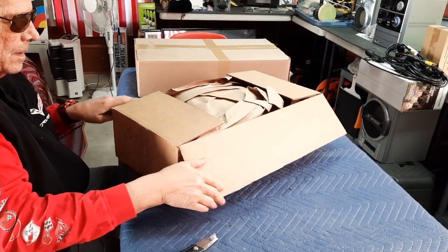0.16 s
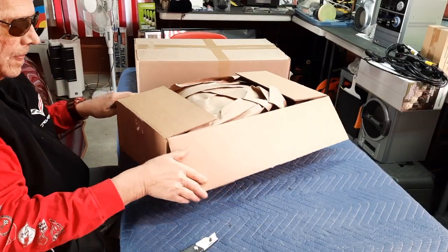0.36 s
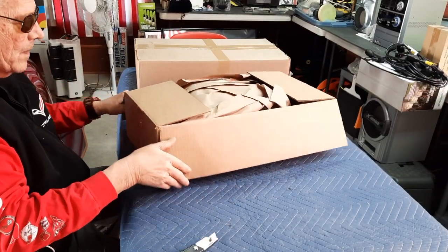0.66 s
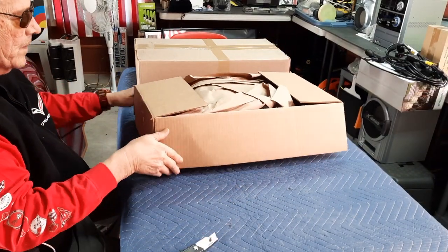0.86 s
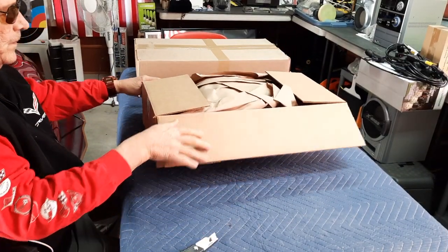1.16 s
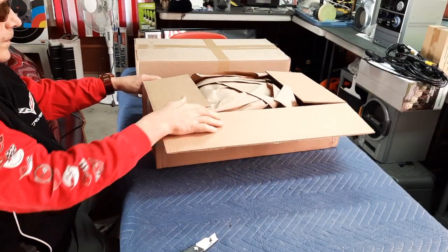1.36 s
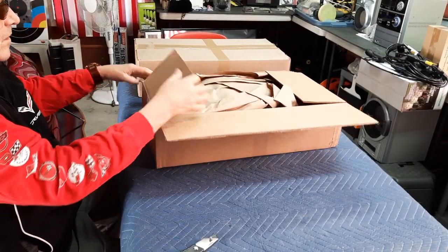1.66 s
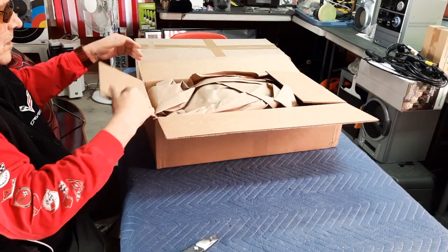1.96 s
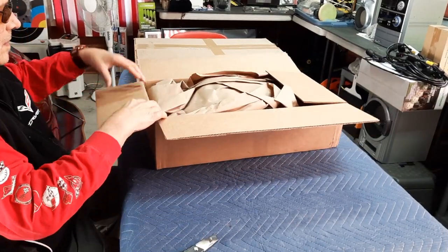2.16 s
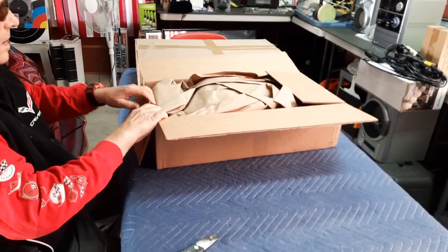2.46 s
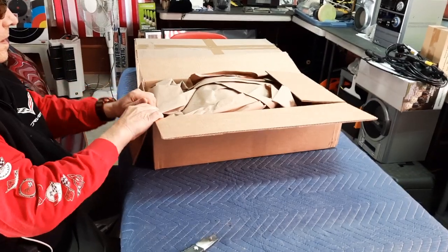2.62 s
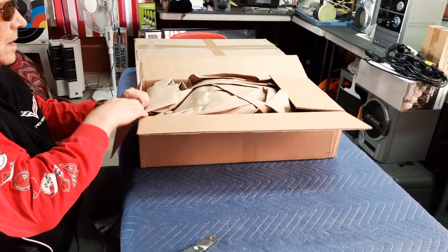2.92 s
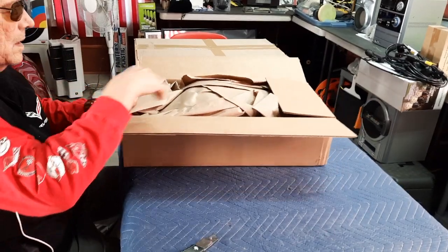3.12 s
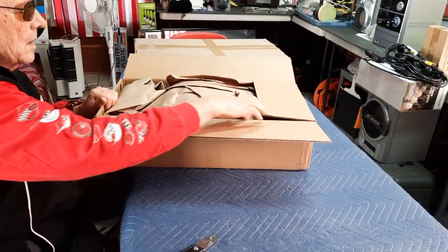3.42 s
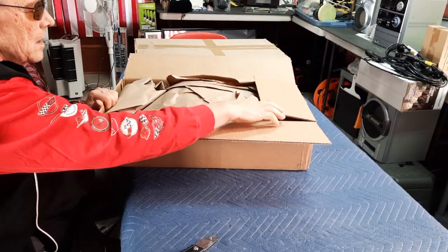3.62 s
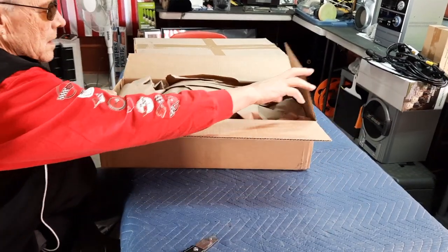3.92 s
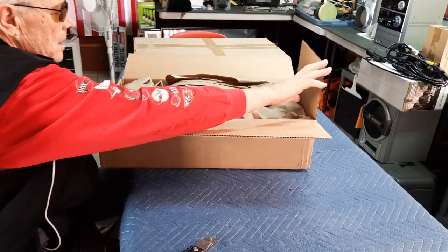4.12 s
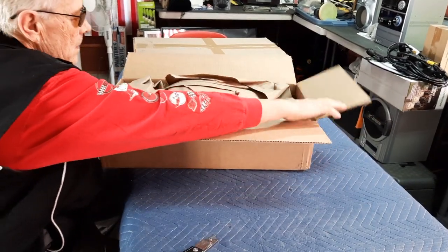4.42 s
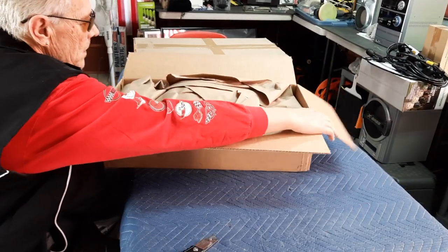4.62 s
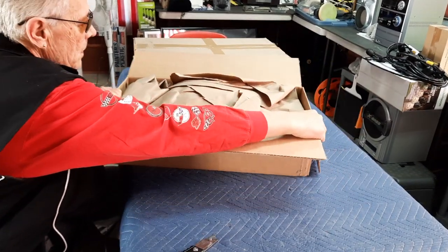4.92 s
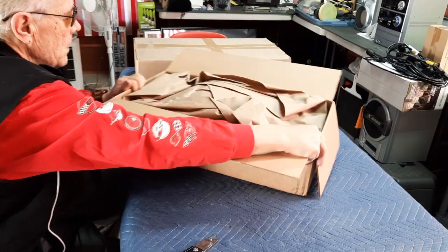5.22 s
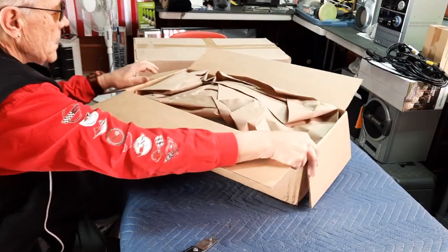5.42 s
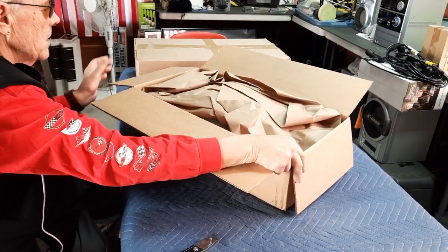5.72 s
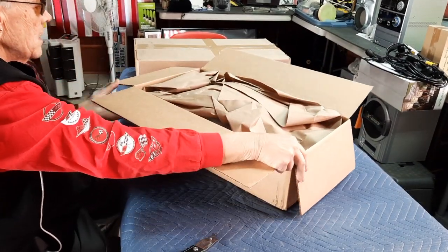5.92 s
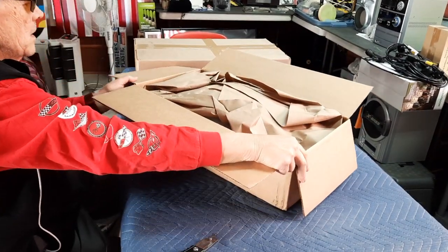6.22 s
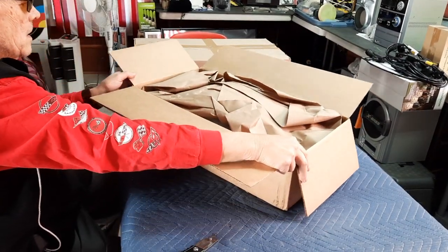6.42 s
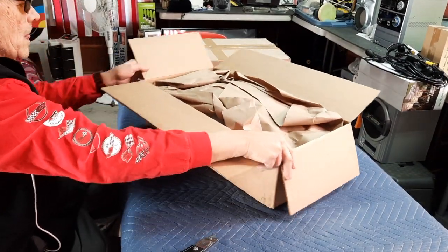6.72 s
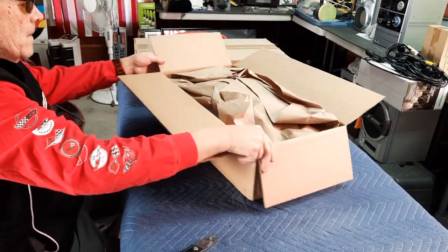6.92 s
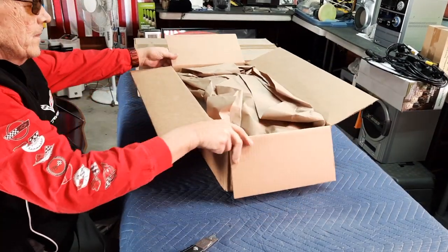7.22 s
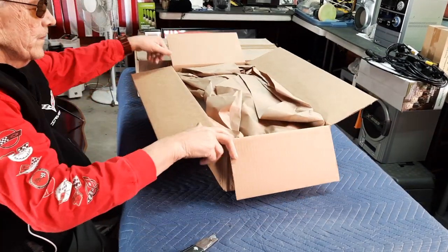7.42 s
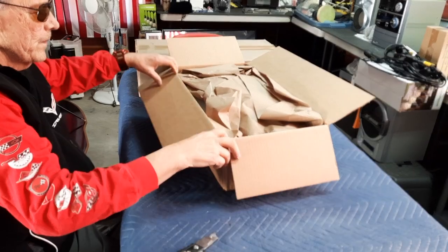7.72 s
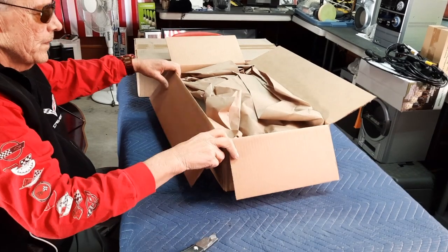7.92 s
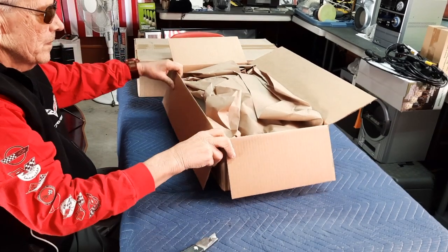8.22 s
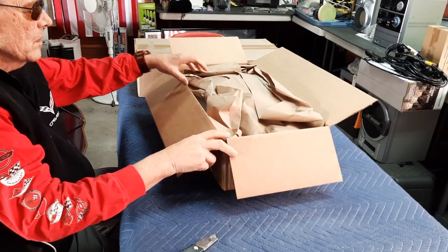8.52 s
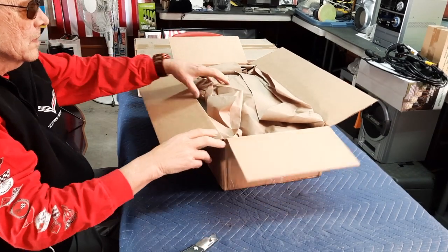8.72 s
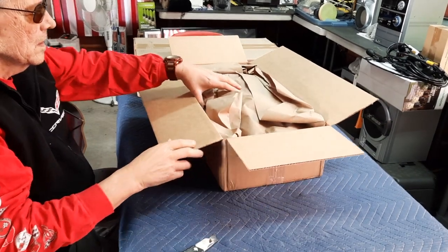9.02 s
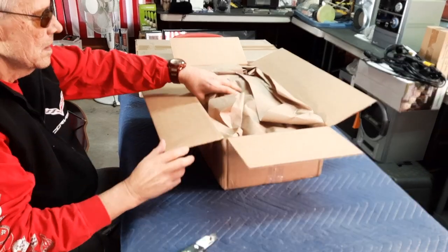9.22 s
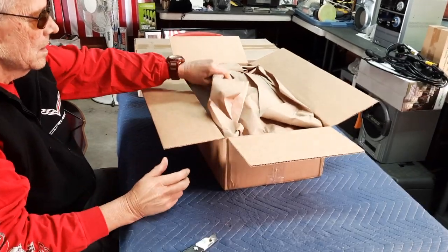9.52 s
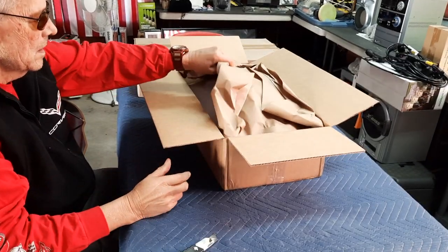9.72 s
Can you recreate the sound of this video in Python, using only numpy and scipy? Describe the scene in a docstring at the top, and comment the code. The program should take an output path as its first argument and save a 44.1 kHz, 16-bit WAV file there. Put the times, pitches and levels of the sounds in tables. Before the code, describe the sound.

Quiet, close cardboard handling in a workshop: sliding fingers and sleeves hiss over board, flaps bend with low hollow scrapes and small muffled thuds. Occasional dry paper creases pop around the middle. A brief judder ends in a single hard, woody knock, followed by more gentle rubbing and a soft thump. In the last second or so, thick packing paper is pulled and crinkles brightly. Stereo leans a little left, with short diffuse echoes.

```python
"""Handling a cardboard box of packing paper

Hands turn and open a cardboard box full of crumpled packing paper on a padded table in a workshop.
Skin and sleeves rub the board: shaped noise that swells with each slide and drag.
Blows set off fading tones of the box and table, once with a hard knock.
The paper's creases snap and crinkle in short bursts of noise.
Two microphone channels hear it all, with the short ring of the room behind paper and blows."""
import sys
import numpy as np
from scipy import signal
from scipy.fft import rfft, irfft, next_fast_len
from scipy.io import wavfile
from scipy.ndimage import uniform_filter1d

SR = 44100
rng = np.random.default_rng(int(sys.argv[2]) if len(sys.argv) > 2 else 0)


def digitize_waveform(pressure):
    """Quantize a signal to 16-bit integers and store it at the path in sys.argv[1].

    Rows of a 2-D input are taken as channels; values are limited to [-1, 1].
    """
    field = np.atleast_2d(pressure).T
    bounded = np.clip(field, -1, 1)
    quanta = np.round(bounded * 32767).astype(np.int16)
    wavfile.write(sys.argv[1], SR, quanta)


def nominal_scale(level):
    """Amplitude ratio for a level in decibels (scalar or array-like)."""
    x = np.asarray(level, float) / 20
    return 10 ** x


N = 434826
SIZE = next_fast_len(N)
HZ = np.fft.rfftfreq(SIZE, 1 / SR)
TIME = np.arange(N) / SR

# tones of the box walls and the air inside: pitch_hz, level_db (relative), t60_s (time to fall 60 dB)
BOX_TONES = [(300, -5, .065), (348, 0, .07), (400, -2, .065), (515, -18, .1), (650, -22, .08),
             (965, -16, .16), (1200, -27, .1), (1740, -19, .15), (2170, -26, .13), (3000, -31, .1)]
# tones of the table top: pitch_hz, level_db (relative), t60_s (time to fall 60 dB)
TABLE_TONES = [(138.7, -4.5, 0.078), (171.4, -4, 0.1), (243, -6.5, 0.037)]


def curve(points):
    """Read a table of (Hz, value) points at every frequency, along a logarithmic pitch scale."""
    hz, value = np.transpose(points)
    return np.interp(np.log(HZ + 1), np.log(hz), value)


def unit(x):
    """Scale to an rms of 1."""
    return x / np.sqrt(np.mean(x ** 2))


def walk(rate_hz):
    """Random levels, a new one every 1 / rate_hz seconds, joined by straight slopes; rms near 1."""
    hold = int(SR / rate_hz)
    steps = np.repeat(rng.standard_normal(N // hold + 1), hold)
    return unit(uniform_filter1d(steps, hold)[:N])


def ring(tones):
    """Struck tones die away; neighbours start in opposite directions, so the ring swells before it fades."""
    t = TIME[:SR // 2]
    total = np.zeros(len(t))
    for k, (pitch_hz, level_db, t60_s) in enumerate(tones):
        fade = np.exp(-np.log(1000) * t / t60_s)
        total += (-1) ** k * nominal_scale(level_db) * np.sin(2 * np.pi * pitch_hz * t) * fade
    return total


def rough(gain, grit_db, rate_hz):
    """Stereo friction noise of rms 1: fibres catch unevenly, the microphones agree mainly in the bass."""
    # how alike both microphones hear it: pitch_hz, likeness (0 to 1)
    likeness = [(200, 0.88), (400, 0.88), (700, 0.69), (1500, 0.3), (4000, 0.29), (10000, 0.07)]
    mid, side = rng.standard_normal((2, len(HZ))) + 1j * rng.standard_normal((2, len(HZ)))
    alike = np.clip(curve(likeness), 0, 1)
    mid = mid * np.sqrt(1 + alike)
    side = side * np.sqrt(1 - alike)
    noise = irfft(np.array([mid + side, mid - side]) * gain, SIZE)[:, :N]
    return unit(noise * nominal_scale(grit_db * walk(rate_hz)))


def effort(rows, fall_db_s, still_db, above_db=0):
    """Level in dB of movements that set in fast, change evenly and die away."""
    rise_db_s = 500
    stop_db_s2 = 348  # longer movements stop more abruptly: extra dB/s per second of length
    start_s, length_s, first_db, last_db = np.transpose(rows)[:4, :, None]
    coarse = TIME[::64]
    t = coarse - start_s
    db = first_db + (last_db - first_db) * np.clip(t / length_s, 0, 1)
    db = db + np.reshape(above_db, (-1, 1))
    db = db - rise_db_s * np.maximum(0.03 - t, 0)
    db = db - (fall_db_s + stop_db_s2 * length_s) * np.maximum(t - length_s, 0)
    power = np.sum(nominal_scale(db) ** 2, axis=0) + nominal_scale(still_db) ** 2
    return np.interp(TIME, coarse, 10 * np.log10(power))


def hands_db():
    """Levels of scrape, whisper, skin, boom and rumble: paper stirs with both movements, table with drags."""
    # the box and its flaps dragged or bent: start_s, length_s, start_level_db, end_level_db,
    # boom_db (boom of the walls above the drag)
    drags = [(0.025, 0.49, -66, -66, -1.5), (0.543, 0.565, -70, -56.5, -3.5),
             (1.103, 0.14, -56.5, -51.5, -21), (1.21, 0.41, -58.5, -59, -11), (1.989, 0.23, -58, -66, -11),
             (2.257, 0.46, -55.5, -49, -5), (2.72, 0.18, -60, -61, -10), (2.886, .1, -50, -52, -3.5),
             (3.026, 0.43, -57.5, -68.5, -12), (3.523, 0.13, -71, -53, 5.5),
             (3.755, 0.51, -85.5, -84, 22.5), (4.053, 0.18, -72, -68, 11), (4.273, 0.42, -64.5, -67, -12),
             (4.447, 0.067, -49.5, -51.5, -4), (4.578, 0.55, -57.5, -51.5, -1.5),
             (5.057, 0.3, -50, -48.5, -9), (5.286, 0.35, -46.5, -53.5, -10),
             (5.554, 0.2, -52.5, -58.5, 2.5), (5.976, 0.22, -67, -51, 5.5),
             (6.258, 0.077, -45.5, -42.5, -6), (6.483, 0.27, -65.5, -58.5, -6),
             (6.775, 0.4, -58.5, -59, -6.5), (7.185, 0.39, -57.5, -54.5, -9), (7.622, 0.22, -60.5, -61, -2),
             (7.836, 0.086, -50, -50, -0.5), (8.01, 0.14, -74, -62.5, -7), (8.325, 0.09, -49.5, -54.5, -1),
             (8.472, 0.14, -82, -65, -6), (8.616, 0.13, -72, -46.5, -14), (8.709, 0.19, -48.5, -46, 0.5),
             (8.962, 0.33, -56.5, -52.5, 0.5), (9.183, 0.15, -39.5, -47, -3.5),
             (9.322, 0.12, -38, -42, -3.5), (9.438, 0.39, -41, -41.5, -4)]
    # skin and sleeves sliding over the board: start_s, length_s, start_level_db, end_level_db
    slides = [(0, 0.045, -43, -63), (.08, 0.45, -67.5, -64.5), (.55, 0.37, -68.5, -64),
              (.965, 0.2, -57, -54.5), (1.125, 0.47, -48, -48.5), (1.65, 0.28, -64, -65),
              (1.94, 0.29, -48.5, -56), (2.275, 0.36, -57, -51.5), (2.7, 0.21, -64, -64),
              (2.885, 0.098, -53, -51.5), (3.04, .37, -59.5, -68.5), (3.485, 0.28, -59, -70.5),
              (3.83, 0.13, -63, -62), (3.98, .17, -70, -66.5), (4.19, 0.26, -61, -52.5),
              (4.55, 0.59, -72, -61.5), (5.065, 0.38, -58, -56), (5.285, .1, -52, -56),
              (5.43, .12, -64, -68), (5.57, .1, -54, -57), (5.945, 0.066, -64, -60),
              (6.06, 0.18, -64.5, -57), (6.265, 0.056, -50, -42.5), (6.52, 0.3, -80, -58.5),
              (6.8, .38, -61, -63), (7.215, 0.16, -60, -52), (7.36, 0.18, -50, -57.5),
              (7.68, .12, -57, -63), (7.815, 0.092, -50, -56), (8.0, 0.16, -73, -91),
              (8.305, 0.073, -61, -53), (8.46, 0.11, -73, -80), (8.605, 0.1, -63, -56.5),
              (8.75, 0.25, -64, -59.5), (9.0, 0.24, -67, -60), (9.26, .09, -55, -55),
              (9.365, 0.13, -50, -59), (9.575, 0.13, -64, -63), (9.72, 0.12, -49, -48.5)]
    # levels while nothing moves: scrape_db, skin_db, boom_db
    scrape_still_db, skin_still_db, boom_still_db = (-77.5, -84, -77.5)
    drag_fall_db_s, slide_fall_db_s = 94, 129
    scrape = effort(drags, drag_fall_db_s, scrape_still_db)
    skin = effort(slides, slide_fall_db_s, skin_still_db)
    boom = effort(drags, drag_fall_db_s, boom_still_db, np.transpose(drags)[4])
    whisper = skin + 0.49 * (scrape - skin) + 0.5
    rumble = 0.73 * scrape - 27.5
    return scrape, whisper, skin, boom, rumble


def rubbing():
    """Hands slide over board and paper; the same friction shakes the box walls and the table."""
    # colours of board scrape, paper whisper and skin: pitch_hz, level_db (per Hz, relative)
    scrape_colour = [(300, -16.5), (500, -2.5), (1000, -2), (1700, -4), (2100, -6), (3000, -10.5),
                     (6000, -20.5)]
    whisper_colour = [(1800, -10), (2800, -6.5), (4200, -9), (6300, -6), (8000, -8.5), (11000, -45)]
    skin_colour = [(5000, -29), (7500, -5), (9500, -1), (12000, 1.5), (14000, -5), (15800, -10.5)]
    # the table's slowest sway, felt as a dull drone: time_s, level_db
    sway_points = [(0.0, -61), (0.13, -75), (4.42, -75), (4.61, -64.5), (5.16, -87), (5.55, -86),
                   (5.88, -73), (6.45, -81), (6.81, -75), (7.63, -64), (8.79, -69), (9.36, -77),
                   (9.58, -65), (9.86, -78)]
    # the box edge judders over the pad around its hard drop: time_s, level_db
    judder_points = [(6.258, -55.5), (6.267, -37.5), (6.3, -28.5), (6.326, -28), (6.345, -48.5),
                     (6.44, -48.5)]
    scrape_db, whisper_db, skin_db, boom_db, rumble_db = hands_db()
    walls = np.abs(rfft(ring(BOX_TONES), SIZE))
    table_top = np.abs(rfft(ring(TABLE_TONES), SIZE))
    sway = 1 / (1 + ((HZ - 72) / 14) ** 2)  # one broad hump at 72 Hz
    sway_db = np.interp(TIME, *np.transpose(sway_points))
    judder_db = np.interp(TIME, *np.transpose(judder_points), left=-200, right=-200)

    sound = nominal_scale(scrape_db) * rough(nominal_scale(curve(scrape_colour)), 0.43, 90)
    sound += nominal_scale(whisper_db) * rough(nominal_scale(curve(whisper_colour)), 1.4, 120)
    sound += nominal_scale(skin_db) * rough(nominal_scale(curve(skin_colour)), 1.1, 60)
    sound += nominal_scale(boom_db) * rough(walls ** 0.75, 3, 30)
    sound += nominal_scale(rumble_db) * rough(table_top, 3, 20)
    sound += nominal_scale(sway_db) * rough(sway, 4.6, 3)
    # quick slips are hard contacts: they reach the upper tones of the walls
    sound += nominal_scale(judder_db) * rough(walls * HZ ** 0.54, 2.3, 60)
    return sound


def blows():
    """A short soft push rings the box and the table; the flaps rattle and the box settles on the pad."""
    # blows on the box: start_s, level_db (peak of the thump), table_db (table's share),
    # rattle_db (flaps, relative to the thump)
    hits = [(0.055, -51.5, 8, -28), (1.118, -47.5, 1, 3.5), (1.166, -44.5, -5, -20),
            (2.014, -40.5, 5.5, -30), (2.623, -41.5, -17, -26), (2.912, -44, -11, -19),
            (3.629, -35, -4.5, -7), (3.777, -42.5, -8, -18), (4.057, -41.5, -20, -12),
            (4.156, -45, -13.5, -3.5), (4.493, -45, -21, 4), (5.463, -30.5, -22, -11),
            (5.599, -39, -16, -14), (6.091, -40.5, -16.5, -11.5), (6.3265, -6, -20, -30),
            (6.373, -27, -10.5, -22), (6.448, -34.5, -33, -33), (6.6, -43.5, 9, -18), (6.769, -50, 8, -4),
            (6.89, -53.5, 13.5, -12), (7.298, -48, 11, -28), (7.697, -33, 3.5, -16),
            (7.844, -39.5, -30, -27), (8.369, -39, -27, -3), (9.212, -38.5, -23, -11)]
    contact_ms = 0.58  # time from the push's peak to 1/e
    box = ring(BOX_TONES)
    box_share = box / np.abs(box).max()
    table = ring(TABLE_TONES) + ring([(72, -19.5, 0.16)])
    t = TIME[:len(box)]
    push = np.exp(-(t[:400] * 1000 / contact_ms - 2) ** 2)
    flap_band = signal.butter(2, [270, 1200], "band", fs=SR)
    pad_band = signal.butter(2, [105, 430], "band", fs=SR)
    rattle_swell = np.exp(-t / 0.025) * (1 - np.exp(-t / 0.007))
    settle_swell = np.exp(-t / 0.044) * (1 - np.exp(-t / 0.012))
    out = np.zeros(N + len(box))
    for start_s, level_db, table_db, rattle_db in hits:
        thump = np.convolve(push, box_share + nominal_scale(table_db) * table)[:len(box)]
        thump = thump / np.abs(thump).max()
        rattle = unit(signal.lfilter(*flap_band, rng.standard_normal(len(t)))) * rattle_swell
        settle = unit(signal.lfilter(*pad_band, rng.standard_normal(len(t)))) * settle_swell
        blow = thump + nominal_scale(rattle_db) * rattle + nominal_scale(table_db - 12) * settle
        i = int(start_s * SR)
        out[i:i + len(box)] += nominal_scale(level_db) * blow
    return np.array([out[:N], out[:N]])


def strokes():
    """Fingers or a flap brush once across the board: a swell of friction noise in one band, narrow or wide."""
    # short strokes: start_s, length_s, pitch_hz (centre), half_width_hz, level_db (rms before the swell)
    brushes = [(0.147, .48, 1140, 546, -61), (0.653, .48, 1240, 544, -59), (1.199, 0.45, 2150, 1200, -49.5),
               (1.689, 0.37, 4400, 1030, -59), (3.491, 0.19, 4650, 2630, -54),
               (4.148, 0.062, 9400, 3000, -52), (7.453, 0.088, 1210, 500, -46.5),
               (7.456, 0.064, 2900, 1990, -45.5), (7.545, 0.2, 1400, 150, -62),
               (8.039, 0.138, 1310, 196, -64), (8.306, 0.26, 3940, 2400, -55.5),
               (8.318, 0.16, 1090, 660, -53.5)]
    out = np.zeros((2, N))
    for start_s, length_s, pitch_hz, half_width_hz, level_db in brushes:
        i, n = int(start_s * SR), int(length_s * SR)
        band = signal.butter(2, [pitch_hz - half_width_hz, pitch_hz + half_width_hz], "band", fs=SR)
        noise = unit(signal.lfilter(*band, rng.standard_normal((2, n))))
        swell = np.sin(np.pi * np.arange(n) / n)
        out[:, i:i + n] += nominal_scale(level_db) * swell * noise
    return out


def snaps():
    """A crease buckles in a short noise burst, then the sheet shivers, ringing broadly round its own centre."""
    # creases snapping: start_s, level_db (peak), pitch_hz (centre), edge_db (bright edge)
    creases = [(2.5527, -24.5, 1380, -18), (2.557, -31, 1190, -21), (2.632, -29, 1390, -17),
               (2.6632, -25.5, 1460, -17), (2.668, -32, 2060, -10), (2.9043, -33, 1220, -3),
               (3.6262, -34, 1220, -9), (5.0731, -24.5, 1860, -4), (5.2971, -17.5, 1420, -3.5),
               (5.3019, -18, 1600, -31), (5.459, -41, 868.5, -36), (8.7113, -33.5, 1070, -22),
               (8.7393, -17.5, 2410, -4.5), (8.8234, -25, 2780, -12), (8.8773, -27, 2020, -2),
               (9.0176, -34, 1040, -40), (9.1232, -26.5, 1480, -8), (9.2537, -18, 1940, -3.5),
               (9.3577, -15, 2340, 9), (9.455, -31, 2050, -14), (9.5141, -19.5, 1510, -15),
               (9.562, -13.5, 2450, -9), (9.624, -38, 2160, -9), (9.641, -22.5, 1890, -18),
               (9.656, -17, 2070, -6.5), (9.7022, -27.5, 1320, -27), (9.7401, -20, 1750, -23),
               (9.846, -22.5, 1190, -32)]
    burst_ms, shiver_s = 1.56, 0.021  # times to fall to 1/e
    t = TIME[:4096]
    out = np.zeros((2, N + len(t)))
    bright = signal.iirpeak(7000, 0.6, fs=SR)
    for start_s, level_db, pitch_hz, edge_db in creases:
        noise = rng.standard_normal((3, len(t)))
        noise = noise[0] + 0.3 * noise[1:]  # mostly shared by both channels
        burst = noise * np.exp(-t * 1000 / burst_ms)
        shiver = noise * nominal_scale(-8.5) * np.exp(-t / shiver_s)
        band = signal.butter(2, [pitch_hz / 2.37, min(pitch_hz * 2.48, 16000)], "band", fs=SR)
        sheet = signal.lfilter(*band, burst + shiver)
        snap = sheet + nominal_scale(edge_db) * signal.lfilter(*bright, burst)
        i = int(start_s * SR)
        out[:, i:i + len(t)] += nominal_scale(level_db) * snap / np.abs(snap).max()
    return out[:, :N]


def crinkles():
    """Many small folds give way at random while the hand works the paper; few are large."""
    from_s, folds_per_s, fade_ms = 8.7, 220, 1.1
    happens = (rng.random(N) < folds_per_s / SR) * (TIME > from_s)
    size = nominal_scale(5.86 * np.minimum(rng.exponential(size=N), 4))
    gate = signal.lfilter([1], [1, -np.exp(-1000 / SR / fade_ms)], happens * size)
    click = signal.lfilter(*signal.iirpeak(3000, 0.6, fs=SR), gate * rng.standard_normal(N))
    whisper_db = hands_db()[1]
    return nominal_scale(whisper_db + 2.5) * np.array([click, click])


def room(x):
    """Diffuse echoes; the treble differs between the microphones and dies first."""
    t60_s, treble_t60_s = 0.43, 0.24  # times to fall 60 dB
    t = TIME[:SR // 2]
    echo = rng.standard_normal((2, len(t))) * (t > 0.004)
    bass = signal.lfilter(*signal.butter(1, 500, fs=SR), echo)
    echo = echo - bass + bass.sum(axis=0) / np.sqrt(2)  # both channels share the bass
    low = signal.lfilter([0.25], [1, -0.75], echo)
    treble = echo - low
    tail = low * nominal_scale(-60 * t / t60_s) + treble * nominal_scale(-60 * t / treble_t60_s - 2)
    return signal.fftconvolve(x, unit(tail) / np.sqrt(len(t)), axes=1)[:, :N]


def scene():
    """Sudden sounds wake the room; everything sits a little to the left."""
    paper = snaps() + crinkles()
    box = blows()
    hands = rubbing() + strokes()
    hands[1] = np.roll(hands[1], 3)  # the hands reach the right microphone 3 samples later
    echoes = room(nominal_scale(-3.5) * paper + nominal_scale(-13) * box)
    heard = hands + paper + box + echoes
    left_db = 2.5  # left channel above right
    return heard * nominal_scale(np.array([[left_db], [-left_db]]) / 2)


def band_limit(x):
    """A steep low-pass at the top of the band."""
    return signal.sosfilt(signal.butter(12, 17000, fs=SR, output="sos"), x)


def record(dry):
    """The microphone loses the deepest bass and the very top."""
    low_cut = signal.butter(4, 54, "high", fs=SR, output="sos")
    top_cut = signal.ellip(8, 0.3, 30, 15900, fs=SR, output="sos")
    mix = signal.sosfilt(top_cut, signal.sosfilt(low_cut, dry))
    return band_limit(mix)


dry = scene()
out = record(dry)
digitize_waveform(out)
```